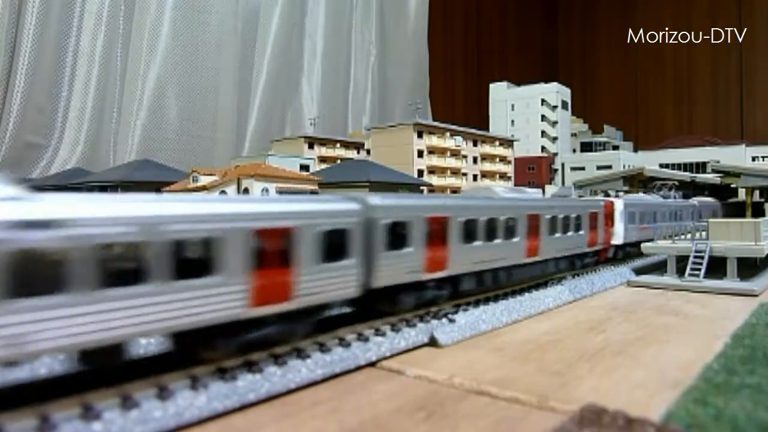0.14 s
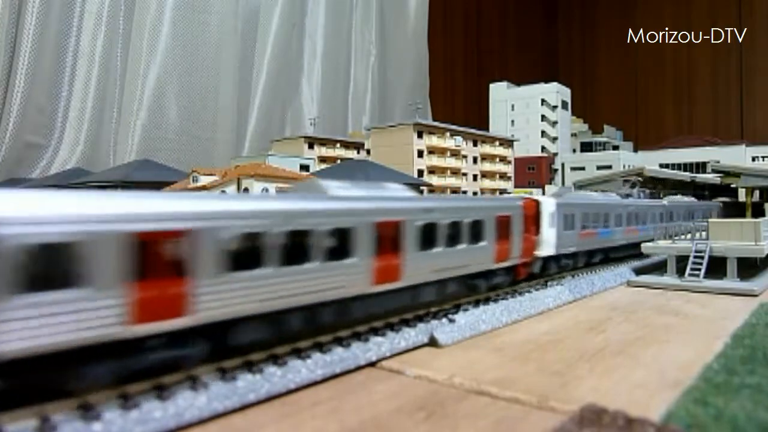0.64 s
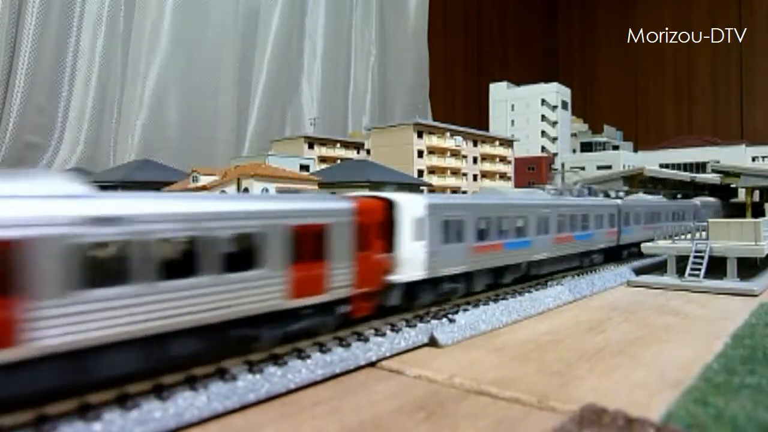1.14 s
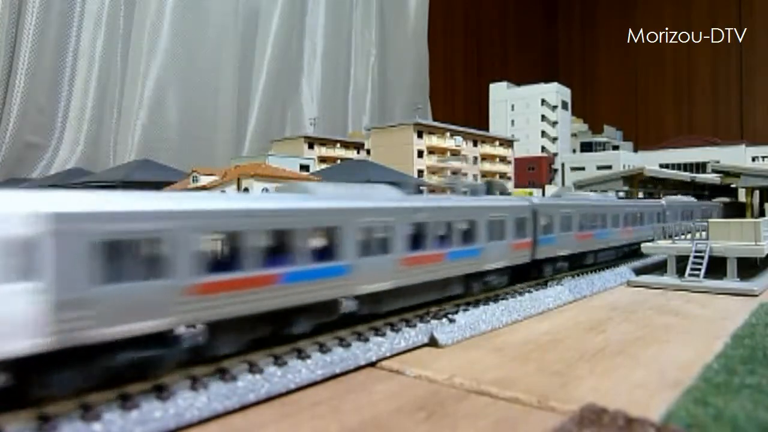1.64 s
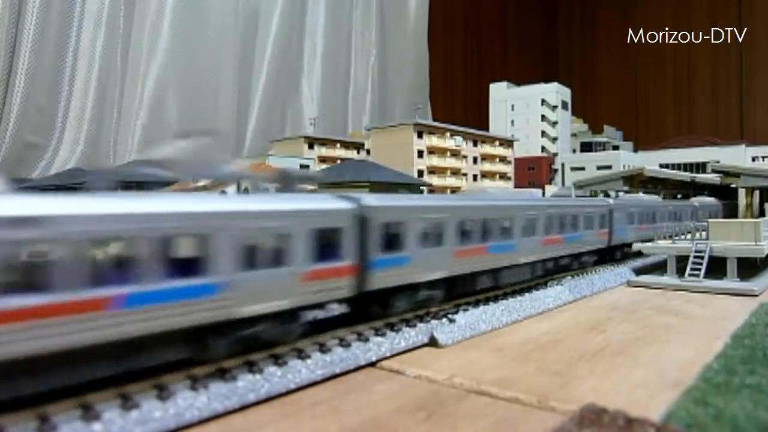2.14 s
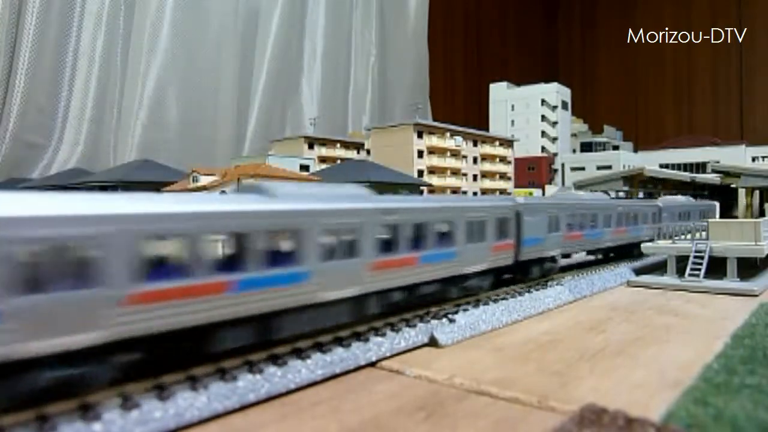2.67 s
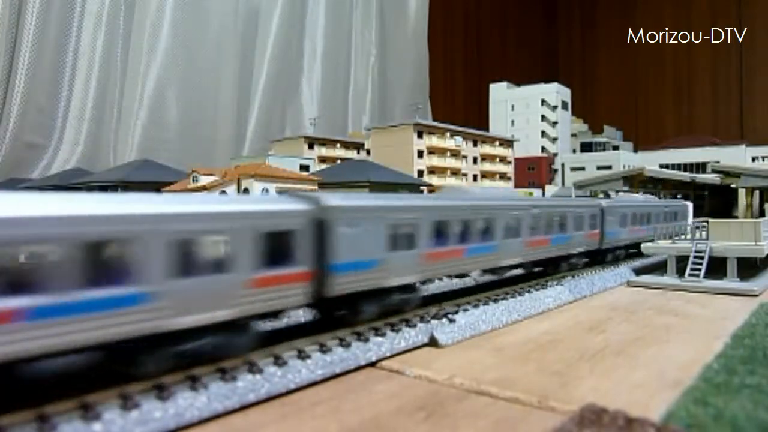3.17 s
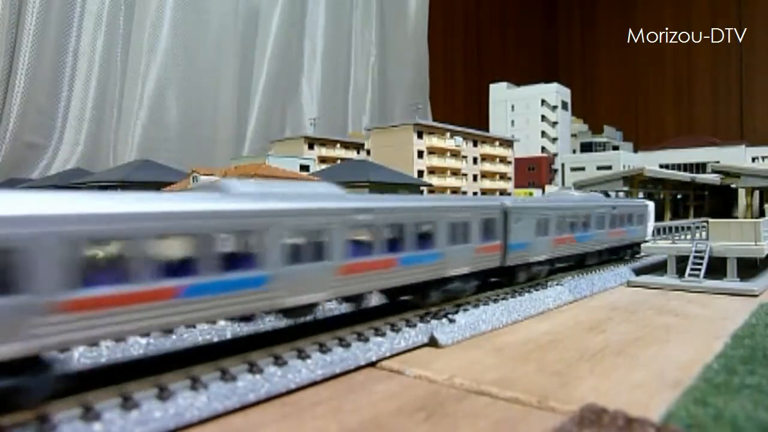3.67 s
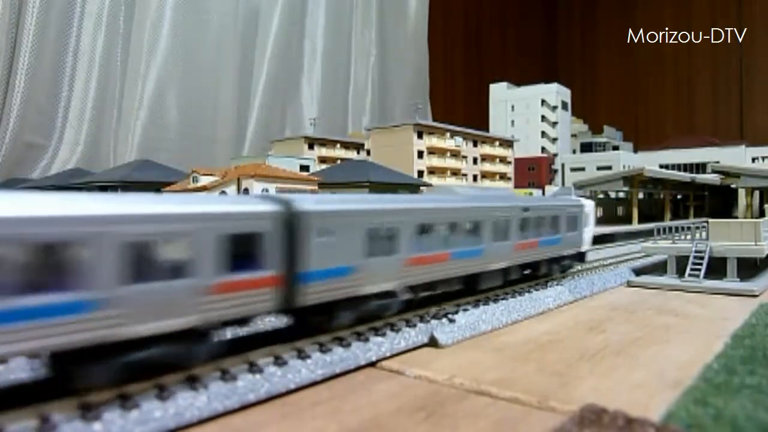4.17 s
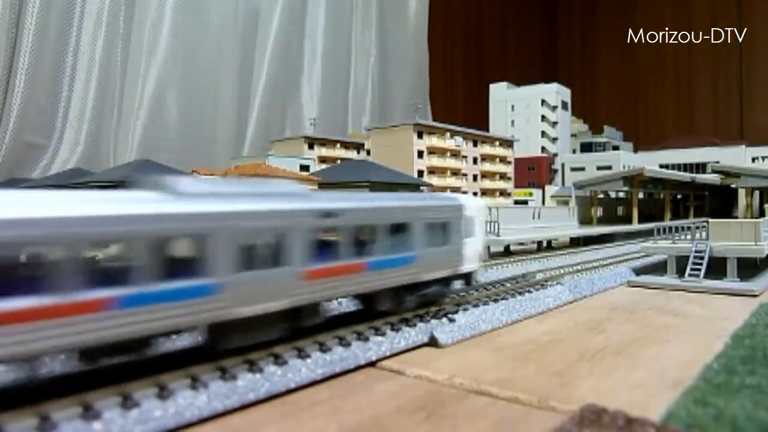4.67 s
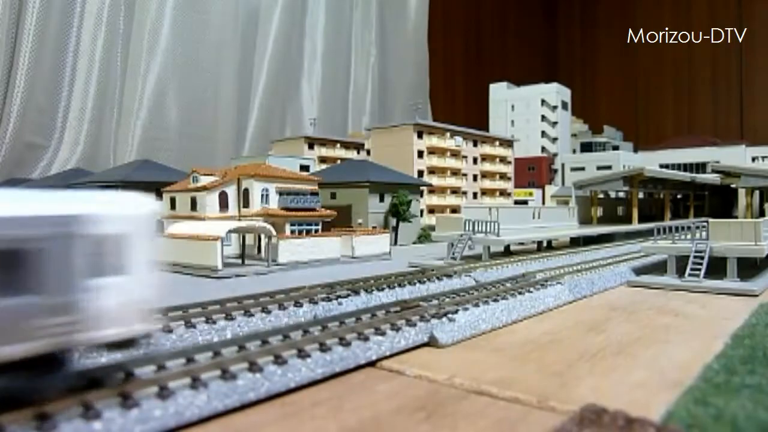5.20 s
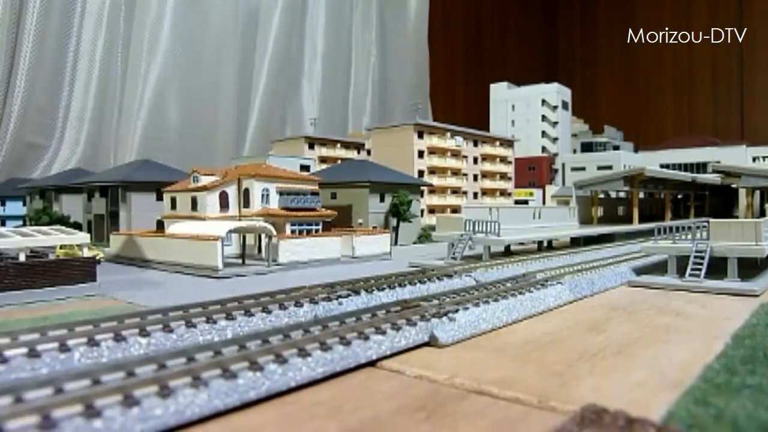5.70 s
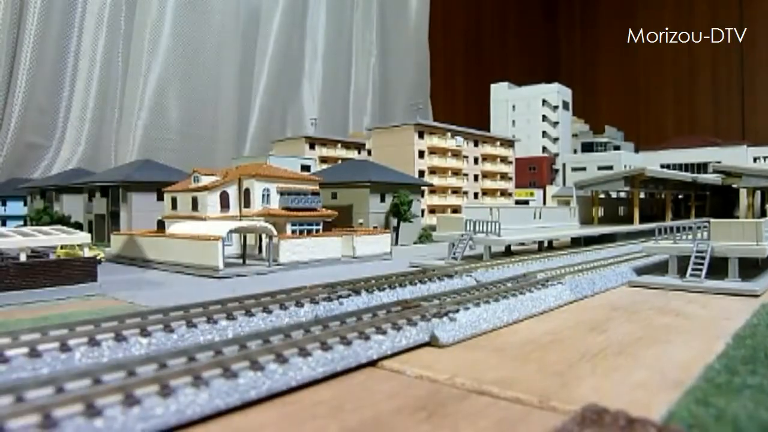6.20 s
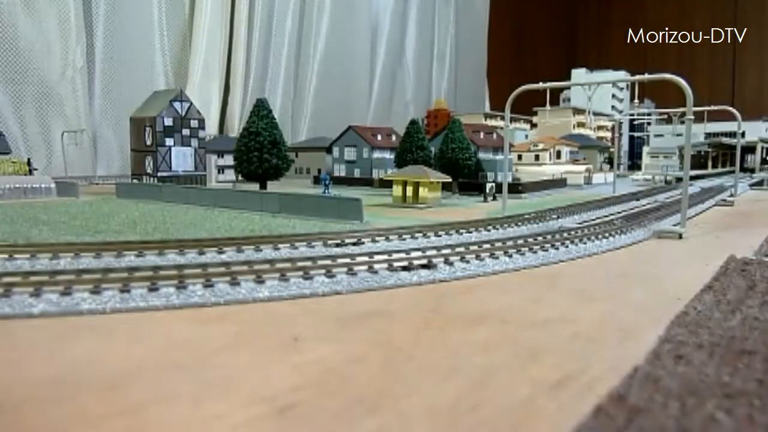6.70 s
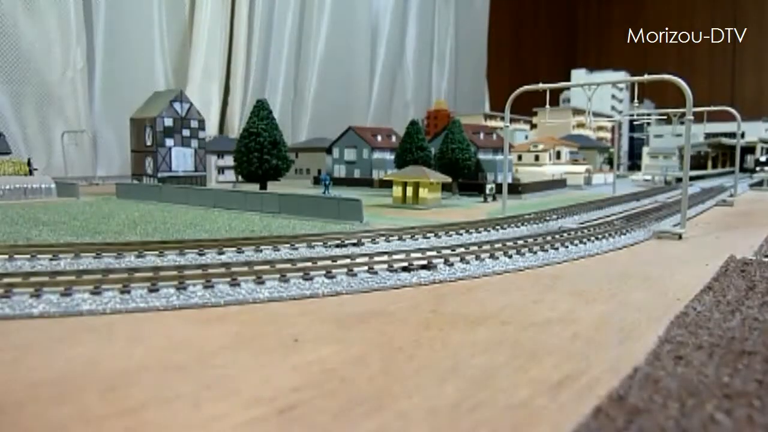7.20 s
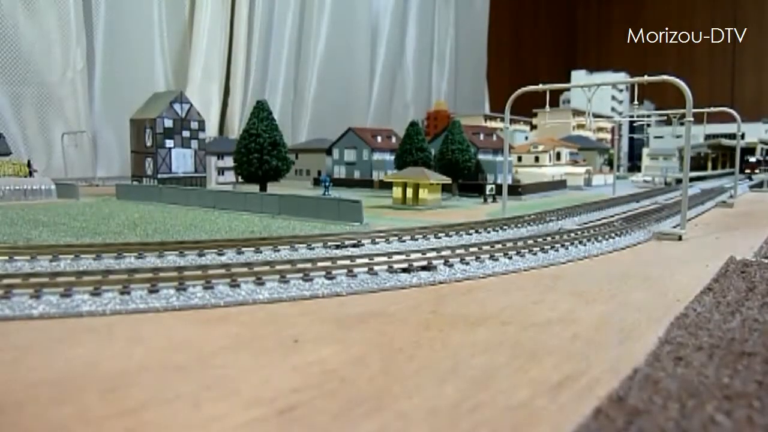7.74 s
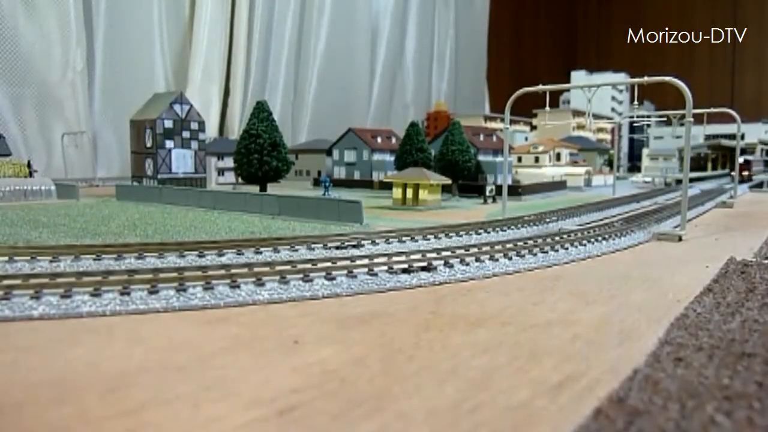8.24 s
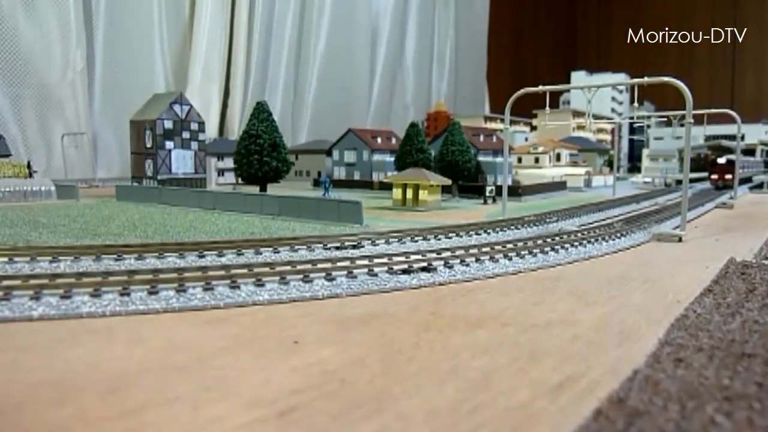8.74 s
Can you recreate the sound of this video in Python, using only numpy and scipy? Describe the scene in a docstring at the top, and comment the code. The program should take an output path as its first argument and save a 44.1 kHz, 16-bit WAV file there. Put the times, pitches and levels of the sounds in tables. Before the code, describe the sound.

Close and dry in a room, tiny metal wheels hiss and rattle over track joints while the board beneath drums softly. A buzzing electric motor grows, passes to the left and recedes with a faint hum. Everything cuts to silence for half a second, then a brighter, thinner rolling hiss fades up from afar, with light clicks becoming more frequent.

```python
"""Metal wheels hiss and tick past at close range while a motor car whirs by towards the left; after a fade and
a cut to silence, a train farther away fades in. It is a small model train on a tabletop track.
Wheels and board are coloured noise; the motor is resonant noise throbbing with the shaft, plus a faint hum.
Rail joints are cracks of noise with a short metal ring; thuds are decaying tones of the board."""
import sys
import numpy as np
from scipy import signal
from scipy.fft import rfft, irfft
from scipy.io import wavfile
from scipy.ndimage import uniform_filter1d, map_coordinates

SR = 44100
rng = np.random.default_rng(int(sys.argv[2]) if len(sys.argv) > 2 else 0)


def voltage_ratio(level):
    """Linear amplitude factor for a level in decibels (scalar or array-like)."""
    return 10 ** (np.asarray(level, float) / 20)


def generate_wav(signal):
    """Clip the signal to [-1, 1] and save it as 16-bit WAV at the path in sys.argv[1]."""
    frames = np.transpose(np.atleast_2d(signal))
    scaled = np.clip(frames, -1, 1) * 32767
    pcm = np.round(scaled).astype(np.int16)
    wavfile.write(sys.argv[1], SR, pcm)


N = 390726
SILENCE_START, SILENCE_END = 5.9755, 6.558  # s, between the two shots
SIZE = 512  # samples in a spectral frame
HZ, TIME, _ = signal.stft(np.zeros(N), SR, nperseg=SIZE)
HZ = HZ[:, None]

# wheels and board, one table per shot:
# (time [s], rolling hiss [dB], extra treble [dB], rumble [dB], left over right [dB])
ROLL = [
    [(0.0, -33.5, -6.5, -43.5, 0), (0.9, -31.5, -4.5, -41.5, 0), (1.22, -32, -4, -37.5, 1),
     (1.5, -30.5, -1.5, -41, 1), (2.3, -32, -3.5, -37.5, 1), (3.2, -30.5, 0.5, -36, 5),
     (3.6, -32, 2.5, -39.5, 6.5), (4.0, -34, 3, -38, 6), (4.76, -38.5, 0, -40, 5.5),
     (5.1, -40, 0, -43.5, 6.5), (5.96, -47.5, -0.5, -49.5, 5.5)],
    [(6.57, -61, 5, -72, 1), (6.75, -51.5, 6.5, -60.5, 1), (7.23, -43.5, 7, -57, 0.5),
     (7.86, -36, 5.5, -50.5, 1), (8.3, -33, 5, -48.5, 1.5), (8.86, -31, 8, -46, 0.5)],
]


def unit(x):
    """Scaled to rms 1."""
    return x / np.sqrt(np.mean(x ** 2) + 1e-20)


def along(points, hz=HZ):
    """(frequency [Hz], value) points read on a log frequency axis."""
    f, v = np.transpose(points)
    return np.interp(np.log(hz + 1), np.log(f + 1), v)


def curves(rows, t=TIME):
    """Each column after the time, read at t."""
    s, *cols = np.transpose(rows)
    return [np.interp(t, s, c) for c in cols]


def wobble(rate):
    """A smooth random curve with rate knots a second."""
    knots = rng.standard_normal(int(N * rate / SR) + 4)
    return map_coordinates(knots, [np.arange(N) * rate / SR])


def flat(gain):
    """A spectrum scaled so that white noise keeps its power."""
    return gain / np.sqrt(np.mean(gain ** 2, axis=0) + 1e-20)


def modes(rows):
    """Gain of resonances whose powers add, scaled to keep the power of white noise."""
    power = sum(voltage_ratio(2 * db) / (1 + (2 * (HZ - hz) / width) ** 2) ** 2 for hz, width, db in rows)
    return flat(np.sqrt(power))


def stereo(envelope, gain, pan_db, patchy_db=0.5):
    """Noise under an envelope, coloured by gain, partly alike in both ears, tilted and delayed to one side."""
    # (frequency [Hz], left-right likeness [0-1])
    alike = [(60, .9), (180, 0.92), (550, 0.92), (1650, 0.85), (5000, 0.52), (15000, 0.56)]
    # (frequency [Hz], share of the left-right tilt that reaches this pitch [0-1])
    sideways = [(300, 0.036), (700, 0.63), (1800, 0.68), (6000, 0.87), (15000, 0.28)]
    a, b = signal.stft(envelope * rng.standard_normal((2, N)), SR, nperseg=SIZE)[2]
    turn = np.arccos(np.clip(along(alike), -1, 1)) / 2
    mid, side = np.cos(turn) * a, np.sin(turn) * b
    lead_s = 6e-6 * pan_db  # the louder side is the nearer one
    lean = voltage_ratio(along(sideways) * pan_db / 2) * np.exp(1j * np.pi * HZ * lead_s)
    pair = np.array([(mid + side) * lean, (mid - side) / lean])
    # random patches of pitch and time, louder or softer
    field = rng.standard_normal(a.shape)
    field = uniform_filter1d(uniform_filter1d(field, 6, 0), 14, 1)
    return signal.istft(pair * gain * voltage_ratio(patchy_db * unit(field)), SR, nperseg=SIZE)[1][:, :N]


def rolling():
    """Rough wheels on rough rail: a gritty, uneven hiss of noise coloured by the rail."""
    # rolling hiss alongside, leaving and far: (frequency [Hz], relative density [dB])
    near_hiss = [(240, -16.5), (400, -3), (586, -7), (1080, -4), (1910, -4.5), (2470, -3.5), (3680, -5),
                 (4560, -4), (6680, -9), (7790, -7), (8400, -7.5), (12900, -10.5), (13900, -15),
                 (15500, -17)]
    leaving_hiss = [(240, -32), (400, -11.5), (683, -8), (796, -11.5), (987, -7), (1470, -7.5), (2120, -7),
                    (3510, -12.5), (4560, -10), (6090, -14), (7910, -11), (11100, -13.5), (15500, -25)]
    far_hiss = [(240, -34), (400, -6.5), (595, -3), (694, -5.5), (772, -2), (834, -1.5), (1360, -4),
                (3210, 1), (3570, -2), (4920, -4), (5820, -6.5), (11100, -15.5), (15500, -22.5)]
    # resonances of the track, near and far: (frequency [Hz], width [Hz], relative level [dB])
    near_rail = [(690, 47, -5), (998, 60, 4.5), (14700, 500, -10.5)]
    far_rail = [(765, 35, 6), (2746, 120, 2), (2970, 90, -2.5), (3210, 120, -2), (4560, 110, 6.5),
                (4820, 110, 3.5)]
    # (frequency [Hz], share of the extra treble that reaches this pitch [0-1])
    treble = [(2500, 0.058), (7000, 0.49), (14000, 0.79)]
    hiss_db, treble_db, _, pan_db = curves(np.vstack(ROLL))
    gone = np.clip((TIME - 2.2) / 2.5, 0, 1)  # the tail of the train sounds duller
    passing = flat(voltage_ratio((1 - gone) * along(near_hiss) + gone * along(leaving_hiss)))
    near = np.hypot(passing, voltage_ratio(-14.0) * modes(near_rail))
    far = np.hypot(flat(voltage_ratio(along(far_hiss))), voltage_ratio(-12.5) * modes(far_rail))
    colour = np.where(TIME < SILENCE_END, near, far)
    # slow unevenness and fast grit, in dB
    grit_db = 0.24 * wobble(6.4) + 0.43 * wobble(14) + 0.79 * wobble(60) + 0.88 * wobble(900)
    gain = colour * voltage_ratio(hiss_db + treble_db * along(treble))
    return stereo(unit(voltage_ratio(grit_db)), gain, pan_db, patchy_db=0.6)


def rumble():
    """The board drums under the wheels: low noise, nearly central, its deepest part weighted apart and wider."""
    # board rumble: (frequency [Hz], relative density [dB])
    board = [(15, -53.5), (25, -25), (50, -18.5), (95, -14), (130, -9), (165, -5), (205, -4.5), (246, 0),
             (300, -1), (390, -3.5), (470, -3.5), (573, -7.5), (800, -10), (1040, -11), (1760, -120)]
    t, hz = np.arange(N) / SR, np.fft.rfftfreq(N, 1 / SR)
    first = t < SILENCE_END
    noise = unit(voltage_ratio(1.2 * wobble(9))) * rng.standard_normal((2, N))
    z = rfft(noise) * voltage_ratio(along(board, hz))
    z = z / np.std(irfft(z[0], N))
    deep = 1 / (1 + (hz / 115) ** 4)
    low, drum = irfft(z * deep, N), irfft(z * (1 - deep), N)
    deep_db = np.where(first, 3.5, 2) + 0.5 * wobble(1.6)  # slow sway
    deep_db = deep_db - 1.1 * t * first  # dB per s: it thins as the first train goes by
    # the drumming is nearly central, the deepest part somewhat wider
    mid, side = drum * voltage_ratio([[0], [-21]]) + voltage_ratio(deep_db) * low * voltage_ratio([[0], [-13]])
    rumble_db = curves(np.vstack(ROLL), t)[2]
    return voltage_ratio(rumble_db) * np.array([mid + side, mid - side])


def motor():
    """An unbalanced three-pole rotor: noise swells once and thrice a turn, inside the resonances of the car."""
    # (time [s], gear whir [dB], frame [dB], brush ring [dB])
    levels = [(0.0, -48, -46, -44.5), (0.6, -53.5, -51, -47.5), (1.0, -51, -46, -44),
              (1.38, -41.5, -41.5, -40.5), (1.76, -44, -39.5, -39.5), (2.1, -39, -41.5, -47),
              (2.45, -38.5, -40, -50), (2.8, -36.5, -37, -49.5), (3.15, -35.5, -44, -51),
              (3.7, -36, -40, -58.5), (4.0, -41.5, -44.5, -43.5), (4.3, -41, -41, -42.5),
              (4.6, -43.5, -45.5, -62), (5.0, -53, -47, -57), (5.8, -61, -57.5, -61)]
    # two bands of brush hiss that slide as the car passes, as its echo off the tabletop shifts:
    # (time [s], lower band [Hz], level [dB], upper band [Hz], level [dB])
    brush_hiss = [(0, 9300, -44, 10100, -52.5), (.4, 9300, -55.5, 9960, -54.5),
                  (.9, 9300, -46, 9930, -48.5), (1.3, 9300, -47, 10000, -43),
                  (1.75, 9300, -45.5, 10050, -41.5), (1.95, 9300, -44.5, 10640, -43),
                  (2.5, 8960, -41, 10540, -40), (2.62, 9300, -43, 10270, -46.5),
                  (2.72, 9400, -35.5, 10900, -41.5), (3.0, 10000, -39, 11130, -47.5),
                  (3.2, 10550, -35, 11300, -46), (3.33, 10010, -43, 11440, -44),
                  (3.55, 9900, -40, 11120, -47), (3.9, 9500, -46, 10600, -50.5),
                  (4.9, 9510, -57, 10870, -56), (5.95, 9720, -62, 11200, -62)]
    # a third, higher band: (time [s], frequency [Hz], level [dB])
    top_hiss = [(0, 12700, -54), (.9, 12800, -55), (1.3, 12800, -50), (1.75, 12900, -48.5),
                (1.95, 12000, -46), (2.5, 12300, -44.5), (2.9, 12500, -50), (3.9, 12400, -57),
                (5.95, 12400, -71.5)]
    # shaft speed: (time [s], turns per second [1/s])
    shaft = [(0, 66), (1.15, 65), (1.33, 96), (1.9, 85), (2.5, 79), (2.95, 87), (3.4, 87.5), (4.3, 86),
             (4.85, 91), (5.1, 90), (5.5, 94), (5.97, 89)]
    # resonances of the car: (frequency [Hz], width [Hz], relative level [dB])
    gears = [(2088, 150, 2), (2372, 250, -2), (2624, 180, -2.5)]
    frame = [(3132, 160, 3.1), (4524, 390, 3), (5585, 150, 4)]
    brush_ring = [(7780, 330, 0)]
    # pitch of the shell's ring: (time [s], frequency [Hz])
    shell = [(0, 1620), (2.0, 1590), (2.55, 1495), (3.05, 1600)]
    t = np.arange(N) / SR
    gear_db, frame_db, ring_db = curves(levels)
    pan_db = 1.9 * curves(ROLL[0])[-1] - 2.5  # one car swings wider than the whole train
    speed, = curves(shaft, t)
    angle = 2 * np.pi * np.cumsum(speed) / SR + 0.21 * wobble(12)

    def throb(once, thrice):
        return unit(1 + once * np.cos(angle) + thrice * np.cos(3 * angle))

    shell_db = -42 + 0.79 * (gear_db - gear_db.max())  # follows most of the gears' swell
    body = [voltage_ratio(gear_db) * modes(gears),
            voltage_ratio(shell_db) * modes([(*curves(shell), 110, 0)]),
            voltage_ratio(frame_db) * modes(frame)]
    low_hz, low_db, mid_hz, mid_db = curves(brush_hiss)
    bands = [(low_hz, low_db), (mid_hz, mid_db), curves(top_hiss)]
    brushes = [voltage_ratio(db) * modes([(hz, 750, 0)]) for hz, db in bands]
    brushes = brushes + [voltage_ratio(ring_db) * modes(brush_ring)]
    whir = stereo(throb(0.42, 0.23), np.linalg.norm(body, axis=0), pan_db)
    whir = whir + stereo(throb(0.87, 0.19), np.linalg.norm(brushes, axis=0), pan_db, patchy_db=1.4)
    # second and third shaft orders swell as the car draws away
    peak_s, rise_s, fall_s = 4.63, 0.5, 1.15
    away = (t - peak_s) / np.where(t < peak_s, rise_s, fall_s)
    hum_db = -65 + 17.5 * (1 - away ** 2).clip(0) + 1.7 * wobble(8.1)
    hum = voltage_ratio(hum_db) * np.sqrt(2) * (np.sin(2 * angle) + 0.23 * np.sin(3 * angle))
    return (whir + hum) * (t < SILENCE_END)


def joints():
    """Each wheel scrapes up to the gap and drops in: a crack of noise rings wheel and rail; small ones rattle."""
    # wheel over a rail joint, mostly in pairs, one axle after the other:
    # (time [s], peak before panning [dB], tilt [dB per 12 kHz])
    gaps = [(0.3022, -19.5, 1.5), (0.4174, -18, -4), (0.5716, -21.5, -8), (0.6365, -19.5, -4),
            (0.7447, -18.5, -4), (0.7834, -18.5, -9.5), (0.8964, -17.5, -10), (1.1094, -21, -4),
            (1.2124, -23.5, -3), (1.2654, -24.5, -6), (1.3304, -13.5, -1.5), (1.4282, -11.5, -5),
            (1.47, -19, -2.5), (1.5628, -19, -7.5), (1.7135, -20, -8), (1.7614, -18.5, -3),
            (1.8316, -21, 0.5), (1.8537, -19, -2.5), (1.9364, -18.5, -3), (2.0453, -19.5, -5),
            (2.1022, -24, 1), (2.3783, -22, -3), (2.5624, -20.5, -4), (2.7003, -15.5, -2),
            (2.8313, -19.5, -6.5), (3.1218, -15.5, 3), (3.2354, -22, -6), (3.2998, -19.5, -1.5),
            (3.334, -14.5, -3.5), (3.5365, -21, -8), (3.6401, -17.5, -5), (3.6704, -24.5, -8),
            (3.7735, -18.5, -2), (4.0796, -26.5, -4), (4.1952, -14.5, -3.5), (4.2887, -14.5, 0),
            (4.6104, -26.5, -0.5), (4.7102, -24.5, -2), (6.8284, -36.5, -6), (6.8818, -36.5, -8),
            (7.331, -32, -5.5), (7.7508, -27.5, -3), (8.0915, -24.5, -2.5), (8.1394, -24, -7.5),
            (8.2394, -26, -6), (8.3894, -24.5, -8), (8.5894, -26, -7), (8.6364, -21, -4.5),
            (8.667, -17.5, -3), (8.7194, -24, -3.5)]
    # ring of wheel and rail: (frequency [Hz], relative level before scatter [dB], decay by 60 dB [s])
    wheel = [(2290, -11.5, 0.004), (3540, -2, 0.012), (4660, 2, 0.0083), (7060, -1, 0.0071),
             (9300, 6, 0.0027), (12770, 1, 0.0032), (12800, -6.5, 0.0084)]
    lead_in_s, rattles = 0.006, 120
    out, t = np.zeros((2, N + SR)), np.arange(2048) / SR - lead_in_s
    hz, after = np.fft.rfftfreq(len(t), 1 / SR), np.maximum(t, 0)
    band = hz ** 2 / (hz ** 2 + 2200 ** 2) / (1 + (hz / 13800) ** 8)

    def scrape(bright_db):
        approach = voltage_ratio(7.5 + 60 * t / 0.018)
        crack = voltage_ratio(7.0 - 60 * t / 0.0064)
        tail = voltage_ratio(-7 - 1.1 * bright_db - 60 * t / 0.055)  # the duller the blow, the more it scrapes on
        return np.where(t < 0, approach, crack + tail)

    # the listed joints scatter around straight ahead
    pans = -1 + 3 * rng.standard_normal((len(gaps), 1))
    # random small blows follow the level and place of the rolling hiss
    when, size, bright, side = rng.random((rattles, 4)).T
    when = when * N / SR
    hiss_db, _, _, roll_pan_db = curves(np.vstack(ROLL), when)
    rattle = np.transpose([when, hiss_db + 2 + 6 * size, -7.5 + 8 * bright, roll_pan_db + 3 * (side - 0.5)])
    for s, db, bright_db, pan_db in np.vstack([np.c_[gaps, pans], rattle]):
        ring = np.zeros(len(t))
        for f, level, t60 in wheel:
            scatter, phase = rng.standard_normal(2)
            fade = voltage_ratio(bright_db * f / 12000 + level + 2.4 * scatter - 60 * after / t60)
            ring += fade * np.sin(2 * np.pi * f * t + 2.5 * phase)
        noise = irfft(rfft(rng.standard_normal(len(t))) * band * voltage_ratio(bright_db * hz / 12000), len(t))
        tick = ring * (t > 0) + scrape(bright_db) * noise
        sides = voltage_ratio(db + pan_db * np.array([[0.5], [-0.5]]))
        out[:, round(s * SR):][:, :len(t)] += sides * tick / abs(tick).max()
    # the drop falls 1.1 ms after its listed time
    return out[:, round((lead_in_s - 0.0011) * SR):][:, :N]


def thuds():
    """A heavy bogie thumps the board, which rings briefly in decaying tones, alike in both ears."""
    # (time [s], peak [dB])
    thumps = [(1.199, -30), (1.436, -32), (1.714, -38), (1.857, -32), (2.822, -32), (2.87, -32.5),
              (3.233, -27.5), (3.354, -34.5), (3.483, -31.5), (3.591, -26.5), (3.762, -29), (3.863, -25),
              (3.915, -26), (4.229, -34)]
    # ring of the board: (frequency [Hz], relative level before scatter [dB], decay by 60 dB [s])
    panel = [(231, -2, 0.1), (294, -1.5, 0.042), (428, -4.5, 0.055)]
    out, t = np.zeros(N + SR), np.arange(8192) / SR
    for s, db in thumps:
        ring = np.zeros(len(t))
        for hz, level, t60 in panel:
            scatter_db = 3.6 * rng.standard_normal()
            ring += voltage_ratio(level + scatter_db - 60 * t / t60) * np.sin(2 * np.pi * hz * t)
        ring = ring * (1 - np.exp(-t / 0.0012))  # soft onset
        out[round(s * SR):][:len(t)] += voltage_ratio(db) * ring / abs(ring).max()
    return out[:N]


def scene():
    """The near train, a silent gap, then the train farther away."""
    t = np.arange(N) / SR
    train = rolling() + motor() + joints() + thuds() + rumble()
    return train * ((t < SILENCE_START) | (t > SILENCE_END))


def low_pass(x):
    """Removes everything above the highest recorded frequency."""
    return signal.sosfilt(signal.butter(12, 16930, fs=SR, output="sos"), x)


def record(dry):
    """The camera keeps nothing above its band limit."""
    top_hz = 15800
    kept = irfft(rfft(dry) * (np.fft.rfftfreq(N, 1 / SR) < top_hz), N)
    return low_pass(kept)


dry = scene()
out = record(dry)
generate_wav(out)
```